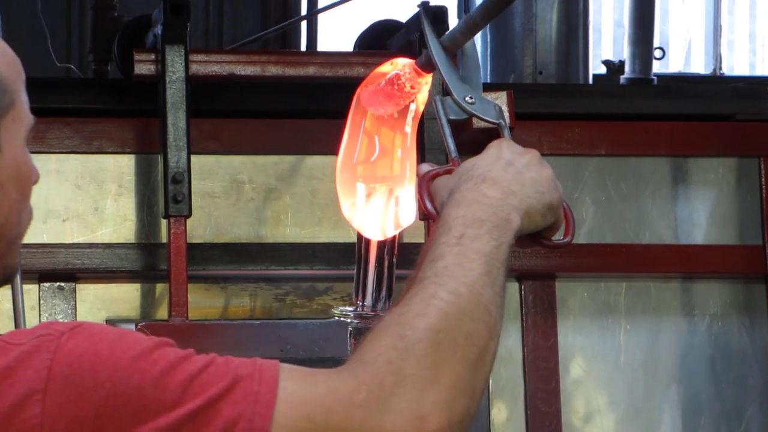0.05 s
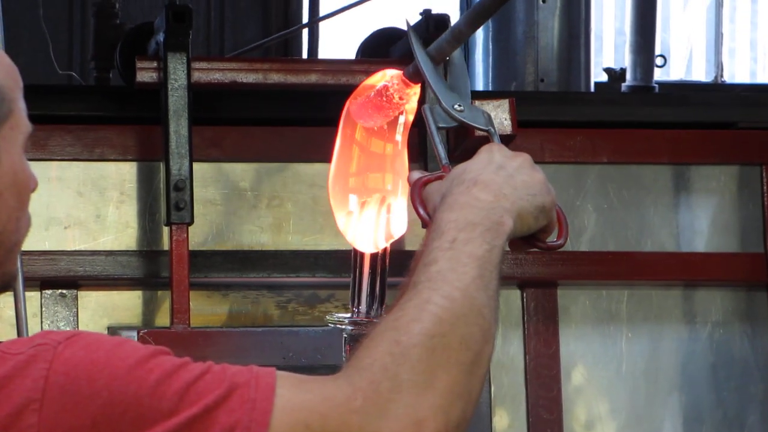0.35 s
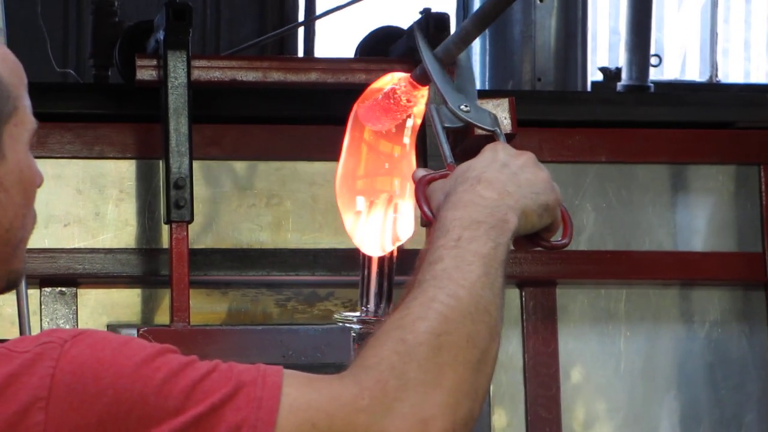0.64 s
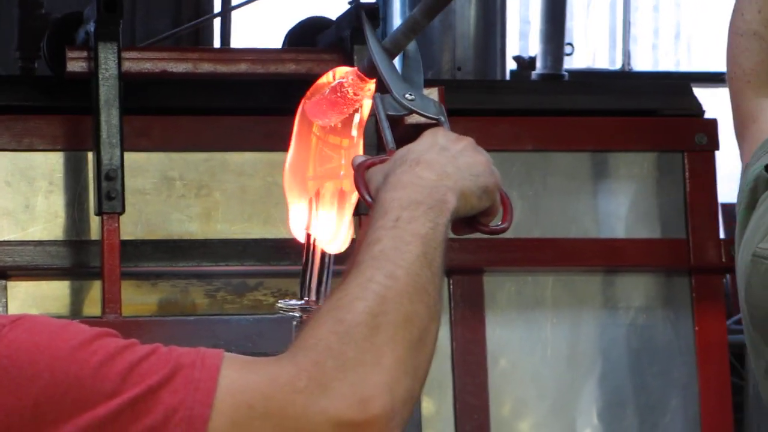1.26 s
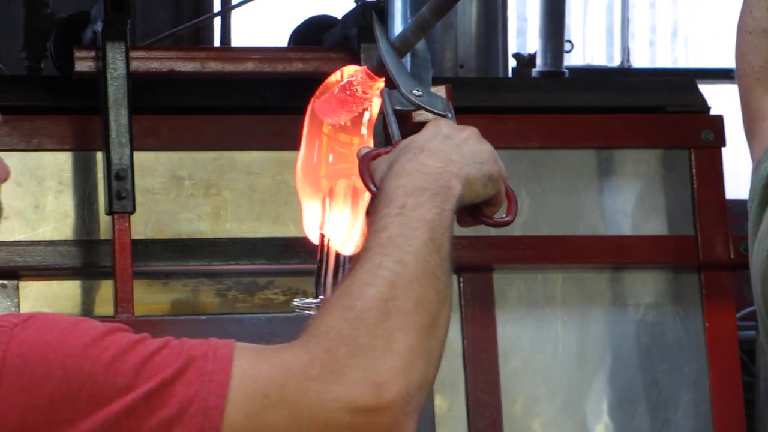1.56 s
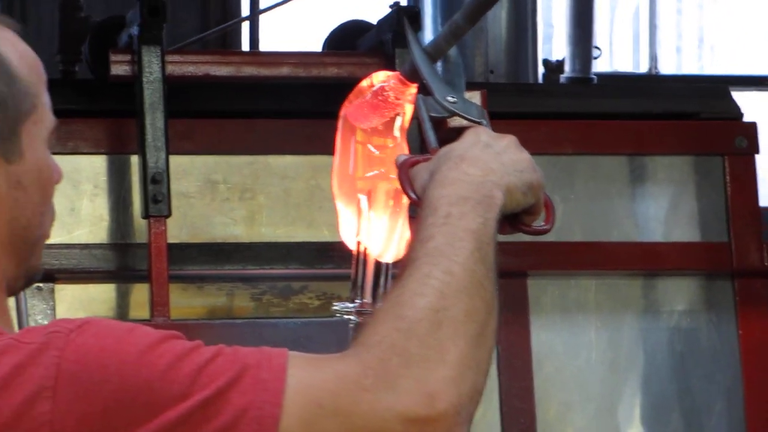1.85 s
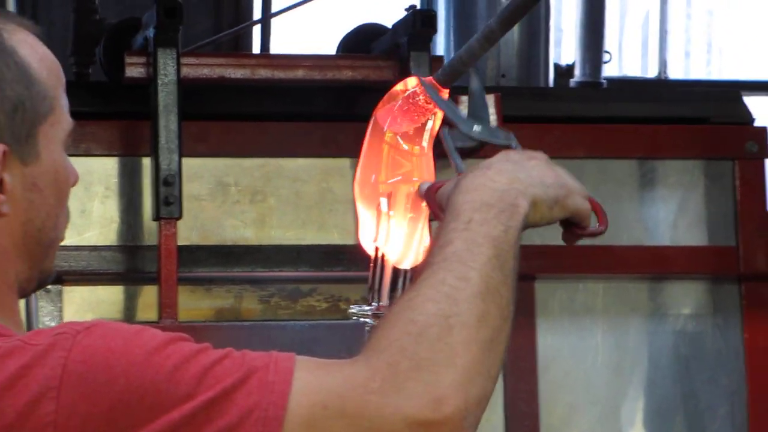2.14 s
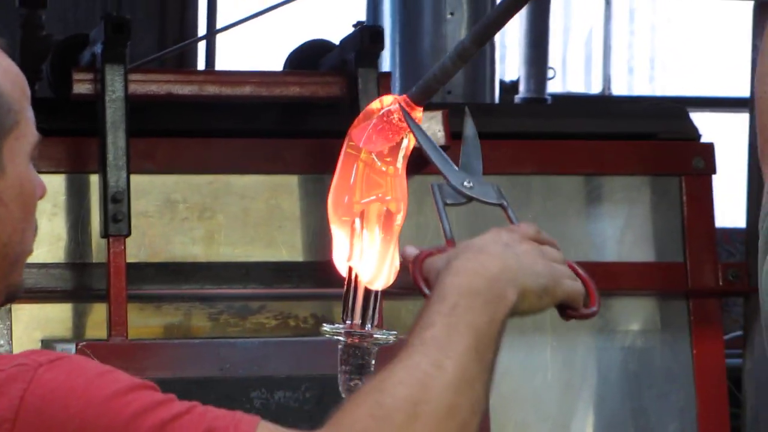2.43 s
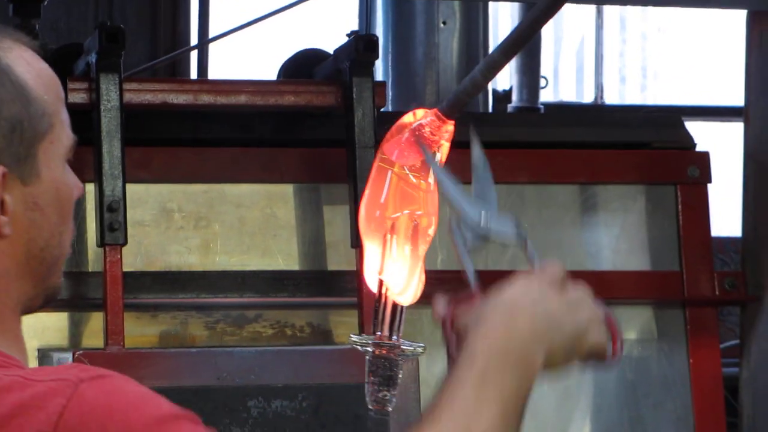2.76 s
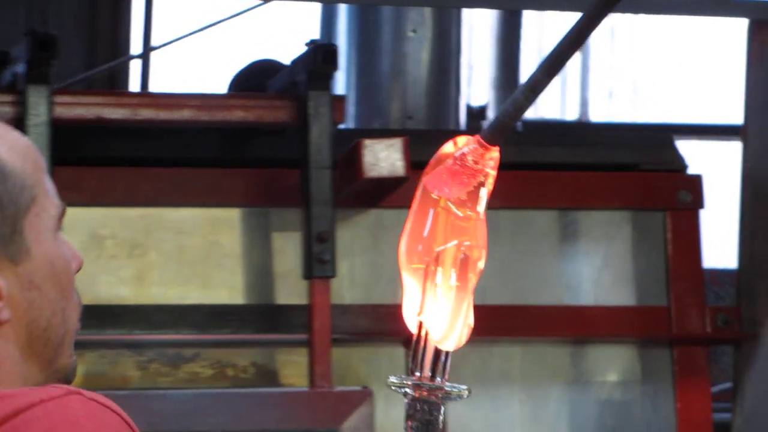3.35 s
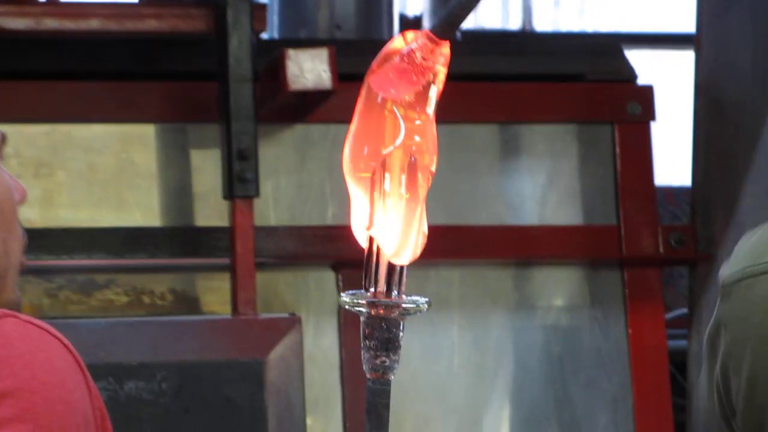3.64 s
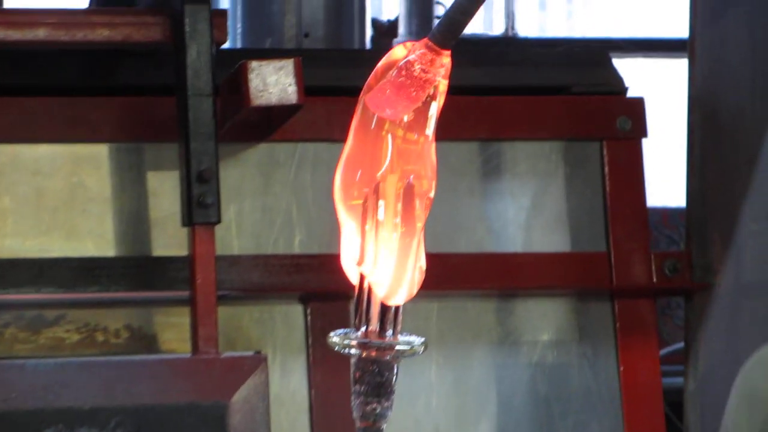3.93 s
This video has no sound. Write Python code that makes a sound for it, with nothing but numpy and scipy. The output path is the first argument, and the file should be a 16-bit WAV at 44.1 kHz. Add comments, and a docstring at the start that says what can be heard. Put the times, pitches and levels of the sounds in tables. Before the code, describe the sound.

A gas furnace roars throughout, with a thin hiss and a deep wavering boom that surges near 1.8 seconds. From 0.3 seconds, steel shears tick and scrape faintly on hot glass. At 2.2 seconds they snap shut with a sharp crack, ringing briefly in the hall. After 3 seconds the boom sinks, the hiss lifts with a faint sizzle, and tools knock lightly a few times.

```python
"""A gas furnace roars in a glass workshop: flame noise rings in hood and ducts, a thin hiss on top.
Almost at once a low boom swells in its chamber, and steel shears start working into hot glass
with faint ticks and scrapes. The boom surges near 1.8 s; at 2.2 s the blades snap shut once,
crack and ring, and the hall answers. In the last second the boom sinks, tools tick and knock,
and the hiss grows as a fine sizzle joins it."""
import sys
import numpy as np
from scipy import signal
from scipy.fft import rfft, irfft
from scipy.io import wavfile

SR = 44100
rng = np.random.default_rng(int(sys.argv[2]) if len(sys.argv) > 2 else 0)


def int16_out(signal):
    """Quantize to a 16-bit WAV file."""
    q = np.round(np.clip(np.atleast_2d(signal).T, -1, 1) * 32767)
    wavfile.write(sys.argv[1], SR, q.astype(np.int16))


N = 176400
TIME = np.arange(N) / SR
FREQS = np.maximum(np.fft.rfftfreq(N, 1 / SR), 1)
SIDE = np.array([[.5], [-.5]])  # shares a left-minus-right amount between the channels


def from_db(db):
    """Decibels to gain."""
    return 10 ** (np.asarray(db) / 20)


def unit_power(x):
    """Scale to an RMS of one."""
    return x / np.sqrt(np.mean(x ** 2) + 1e-20)


def fader(rows):
    """One per-sample curve for each level column of a time table."""
    times, *columns = np.transpose(rows)
    return [np.interp(TIME, times, column) for column in columns]


def over_hz(points):
    """Breakpoints joined by straight lines over log frequency."""
    hz, values = np.transpose(points)
    return np.interp(np.log(FREQS), np.log(hz), values)


def resonance(hz, width_hz):
    """Gain of a resonant peak; centred on 0 Hz it is a low-pass."""
    return 1 / (1 + 2 * ((FREQS - hz) / width_hz) ** 2)


def noise(colour):
    """Mono noise of a given colour, unit power."""
    return unit_power(irfft(rfft(rng.standard_normal(N)) * colour, N))


def burst(start_s, decay_s):
    """A spray of grit with an instant attack and a dying tail, unit energy."""
    age = TIME - start_s
    grit = rng.standard_normal(N) * (age >= 0) * np.exp(-np.clip(age / decay_s, 0, 20))
    return grit / np.linalg.norm(grit)


# Pan of the furnace bed: f/Hz, left-minus-right level/dB
BED_PAN = [(30, 0), (46, -6), (65, -7.5), (105, -8.5), (150, -14), (220, -13), (400, -11), (550, -8.5),
           (850, -4.5), (1200, -6.5), (2700, -1.5), (6400, -1), (9800, -3), (15000, 1.5)]
# Phase offset of the bed: f/Hz, left lead/rad
BED_PHASE = [(30, -1.25), (85, -0.94), (135, -0.78), (220, 0.42), (300, 0.37), (550, 0.46), (950, 0.029),
             (1200, 0.61), (1800, 0.77), (5000, .2), (7200, .2), (12000, 1)]
def place_bed(spectra):
    """Two spectra become unit-power stereo, leaning right and offset in phase."""
    pan = from_db(SIDE * over_hz(BED_PAN))
    pan = pan / np.sqrt(np.mean(pan ** 2, axis=0))
    phase = np.exp(1j * SIDE * over_hz(BED_PHASE))
    return unit_power(irfft(spectra * pan * phase, N))


# Stereo image of the bed: f/Hz, left-right likeness (0 is wide; capped at 0.99, nearly mono)
BED_LIKENESS = [(30, -1), (65, 2.3), (110, 0.9), (220, 0.9), (410, 1.4), (550, 0.6), (900, .94),
                (1400, 0.84), (3500, 0.77), (7500, .45), (15000, 0)]
def bed_noise(colour):
    """Coloured noise spread by the hall: narrow in the low mids, wide in the treble."""
    alike = np.clip(over_hz(BED_LIKENESS), 0, .99)
    mid, side = rfft(rng.standard_normal((2, N)))
    spectra = np.sqrt(1 + alike) * mid + 2 * SIDE * np.sqrt(1 - alike) * side
    return place_bed(colour * spectra)


# EQ of the sizzle: f/Hz, relative level/dB
SIZZLE_EQ = [(9500, -30), (10400, 3), (11400, -2), (12100, -4), (13100, -4), (15500, -3)]
def sizzle(start_s=2.99, rise_s=.03, level_db=-64.5):
    """Very high, faint sizzle that fades in quickly and stays."""
    fade_in = np.clip((TIME - start_s) / rise_s, 0, 1)
    return from_db(level_db) * fade_in * bed_noise(from_db(over_hz(SIZZLE_EQ)))


# EQ of the hiss: f/Hz, relative level/dB
HISS_EQ = [(2500, -8), (5000, -1.5), (6200, 4), (7500, -2.5), (9500, 0), (10800, 4.5), (13200, 4),
           (15500, -5.5)]
# Fader ride of the hiss: t/s, level/dB
HISS_RIDE = [(0, -62), (.8, -67.5), (1.2, -65), (2.0, -64.5), (2.93, -67), (3.02, -62.5), (4, -61.5)]
def hiss():
    """Thin, smooth treble hiss that lifts in the last second."""
    level_db, = fader(HISS_RIDE)
    return from_db(level_db) * bed_noise(from_db(over_hz(HISS_EQ)))


# EQ of the turbulent flame: f/Hz, relative level/dB
FLAME_EQ = [(12, -12), (22, -7), (32, -5), (44, 2.5), (85, 2), (105, -3), (135, 3), (175, -2.5), (218, -6),
            (270, -4), (400, -3.5), (490, -9), (700, -12.5), (860, -13.5), (960, -9.5), (1200, -19),
            (1500, -23), (1900, -30), (2300, -32.5), (3000, -38.5), (4000, -49), (6000, -56.5),
            (16000, -60)]
# Resonances of hood and ducts: f/Hz, width/Hz, level/dB
DUCT_MODES = [(133.5, 25, -38.5), (167.9, 7.2, -39.5), (235.2, 3.3, -40.5), (253.5, 5, -46),
              (278.5, 5, -41.5), (301.4, 10.2, -41), (413.2, 9.5, -47), (427.6, 6, -36.5),
              (447.8, 8.6, -43), (542, 7.3, -42.5), (568.8, 8.9, -43.5), (807, 16.3, -39.5),
              (911.5, 24, -45), (973.4, 16.6, -41), (995, 34, -45.5), (1127, 27, -49.5), (1300, 13, -53),
              (1324, 18, -71), (2156, 29, -62)]
# Rides of the two flame bands, each taken around its mean: t/s, roar level/dB, rush level/dB
FLAME_RIDE = [(0, -25, -33.5), (.22, -26.5, -34), (.75, -26, -33), (1.15, -28, -33), (1.42, -28, -33.5),
              (1.6, -27, -32.5), (1.85, -27, -34.5), (2.03, -27, -32.5), (2.2, -28, -33),
              (2.6, -27.5, -33.5), (2.92, -29.5, -33), (3.02, -31, -35), (3.55, -30.5, -35),
              (3.87, -30.5, -35.5), (4, -27, -34)]
CROSSOVER_HZ = 310
def flame(level_db=-25, flicker_db=.5, rush_depth=.97):
    """Flickering turbulence drives hood and ducts; low roar and upper rush swell separately."""
    flicker = flicker_db * noise(resonance(0, 37))
    sound = from_db(level_db + flicker) * bed_noise(from_db(over_hz(FLAME_EQ)))
    for hz, width_hz, db in DUCT_MODES:
        sound = sound + from_db(db) * bed_noise(resonance(hz, width_hz))
    roar = irfft(rfft(sound) / (1 + (FREQS / CROSSOVER_HZ) ** 4), N)
    rush = sound - roar
    roar_db, rush_db = (ride - ride.mean() for ride in fader(FLAME_RIDE))
    return roar * from_db(roar_db) + rush * from_db(rush_depth * rush_db)


# Swells of the furnace chamber: t/s, level/dB
BOOM_RIDE = [(0, -30.5), (.13, -31), (.24, -26.5), (.6, -25.5), (.8, -27), (.87, -33), (1.2, -28.5),
             (1.42, -48), (1.55, -25.5), (1.69, -44), (1.79, -18.5), (2.07, -27), (2.21, -19.5),
             (2.46, -31), (2.6, -23.5), (2.9, -23), (3.1, -31), (4, -37.5)]
def boom(pitch_hz=67.04, wander_hz=2.94, wobble_rate_hz=8.9, flutter_db=1, trim_db=-.73):
    """The chamber's lowest resonance sustains itself: one deep tone that wanders and flutters."""
    level_db, = fader(BOOM_RIDE)
    wobble_band = resonance(0, wobble_rate_hz)
    hz = pitch_hz + wander_hz * noise(wobble_band)
    tone = np.sin(2 * np.pi * np.cumsum(hz) / SR)
    stereo_tone = place_bed(rfft(tone) * (FREQS < CROSSOVER_HZ))
    return from_db(level_db + trim_db + flutter_db * noise(wobble_band)) * stereo_tone


# Higher resonances of the chamber: f/Hz, width/Hz, level/dB against the boom's ride
CHAMBER_MODES = [(81, 3.5, -11.5), (140, 27, -13), (160.2, 13, -10.5)]
def chamber():
    """Rough upper resonances that swell with the boom and give it body."""
    level_db, = fader(BOOM_RIDE)
    body = sum(from_db(db) * bed_noise(resonance(hz, width_hz)) for hz, width_hz, db in CHAMBER_MODES)
    return from_db(level_db) * body


def hall(send, t60_s=.57, build_s=.0086):
    """Dense reflections that build quickly and die away, with their own tail on each side."""
    t = np.arange(SR) / SR
    envelope = np.exp(-np.log(1000) * t / t60_s) * (1 - np.exp(-t / build_s))
    tail = unit_power(rng.standard_normal((2, SR)) * envelope) / np.sqrt(SR)
    return signal.fftconvolve(send[None], tail, axes=1)[:, :N]


# Tool handling: t/s, level/dB, f/Hz, t60/s
TOOL_KNOCKS = [(1.7024, -43, 3080, 0.022), (2.945, -62, 6000, 0.028), (3.344, -44, 2550, 0.028),
               (3.425, -57, 6000, 0.036), (3.63, -40, 2100, .03), (3.962, -40, 1810, 0.032)]
def knocks(relative_width=.13):
    """Small, quickly damped knocks of tools being handled."""
    sound = 0
    for start_s, db, hz, t60_s in TOOL_KNOCKS:
        age = TIME - start_s
        decay = (age >= 0) * from_db(-60 * np.clip(age / t60_s, 0, 2))
        sound = sound + from_db(db) * decay * noise(resonance(hz, relative_width * hz))
    return sound


# Blade scrapes: centre t/s, half length/s, level/dB, f/Hz
BLADE_SCRAPES = [(1.027, .03, -72, 7000), (1.318, .025, -64, 13500), (1.67, .02, -69, 12800),
                 (1.732, .018, -63, 7000), (2.075, .025, -64.5, 6470), (2.077, .02, -65, 13200),
                 (2.174, .014, -58.5, 11800), (2.73, .02, -66, 12800), (3.367, .015, -60, 3800),
                 (3.392, .04, -64, 12500), (3.746, .04, -67, 6500)]
def scrapes(relative_width=.32):
    """The blades rub on the glass and on each other in short, soft swells of bright noise."""
    sound = 0
    for centre_s, half_s, db, hz in BLADE_SCRAPES:
        swell = np.exp(-.5 * ((TIME - centre_s) / half_s) ** 2)
        sound = sound + from_db(db) * swell * noise(resonance(hz, relative_width * hz))
    return sound


# Blade contacts with the glass: t/s, relative level/dB, low-pass f/Hz, decay/s
GLASS_BITES = [(.3015, -19, 18000, .004), (.309, -17, 12000, .004), (.322, -15, 14000, .04),
               (.668, -19, 14000, .012), (0.927, -21, 15000, .015), (1.7, -14, 4000, .004),
               (1.7105, -16, 14000, .005), (1.717, -15, 10000, .004), (1.723, -10, 9000, .045),
               (2.025, -17, 6000, .003), (2.528, -21, 15000, .002), (2.942, -16, 9000, .008),
               (2.999, -18, 20000, .002), (3.378, -17, 12000, .008), (3.424, -12, 11000, .005),
               (3.441, -14, 12000, .014), (3.63, -16, 3000, .005)]
# EQ of steel crunching on glass: f/Hz, relative level/dB
CRUNCH_EQ = [(800, -23), (2500, 15), (4200, -2), (6000, 0.5), (8500, -1.5), (11000, 3), (13500, 4),
             (16000, 4)]
def bites(trim_db=-12.5):
    """The blades bite into hot glass in small broadband ticks and crunches."""
    grit = 0
    for start_s, db, lowpass_hz, decay_s in GLASS_BITES:
        grit = grit + from_db(db) * rfft(burst(start_s, decay_s)) / np.hypot(1, FREQS / lowpass_hz)
    return from_db(trim_db) * irfft(grit * from_db(over_hz(CRUNCH_EQ)), N)


# Mode clusters of the steel blades: f/Hz, relative level/dB, t60/s
BLADE_MODES = [(3500, -2, 0.13), (4300, -6, .16), (5000, -10, .14), (6000, -9, .15), (6870, -3, 0.3),
               (8021, -7, 0.19), (9250, -8, 0.17), (10600, -1, .23), (11680, -3, .27), (12450, -10, .17),
               (13250, -3, .13), (14860, -10, .2), (15650, -10, .14)]
def blade_ring(blows, cluster_width_hz=210):
    """Clusters of close modes: every blow adds energy, and each cluster dies at its own rate."""
    ring = 0
    for hz, mode_db, t60_s in BLADE_MODES:
        energy = 0
        for start_s, blow_db, _ in blows:
            age = TIME - start_s
            energy = energy + (age >= 0) * from_db(blow_db - 60 * np.clip(age / t60_s, 0, 4)) ** 2
        ring = ring + from_db(mode_db) * np.sqrt(energy) * noise(resonance(hz, cluster_width_hz))
    return ring


# The closing blow and its two rebounds: t/s, relative level/dB, decay/s
SNAP_BLOWS = [(2.1942, 1.5, .0028), (2.203, 0, .0075), (2.211, -9, 0.018)]
# EQ of steel cracking on steel: f/Hz, relative level/dB
CRACK_EQ = [(800, -27), (2200, 5), (3500, -7), (6000, 0.5), (7000, 3), (7700, -6), (9500, 0), (10800, 7.5),
            (12500, 1), (13400, 6), (14200, -4), (16000, -3)]
def snap(crack_db=-13, ring_db=-50.5):
    """The blades snap shut and rebound: each blow is a dry crack and sets them ringing."""
    grit = sum(from_db(db) * burst(start_s, decay_s) for start_s, db, decay_s in SNAP_BLOWS)
    crack = irfft(rfft(grit) * from_db(over_hz(CRACK_EQ)), N)
    return from_db(crack_db) * crack + from_db(ring_db) * blade_ring(SNAP_BLOWS)


def scene(hall_db=-4, tools_pan_db=-3.5, left_lead_s=1e-5):
    """The furnace bed under the tools, which are a little louder on the right and feed the hall."""
    steel = snap() + bites() + scrapes() + knocks()
    direct = irfft(rfft(steel) * np.exp(2j * np.pi * FREQS * left_lead_s * SIDE), N)
    tools = (direct + from_db(hall_db) * hall(steel)) * from_db(tools_pan_db * SIDE)
    return flame() + boom() + chamber() + hiss() + sizzle() + tools


def record(dry, fade_s=.003, cutoff_hz=15850):
    """Short fades at both ends, then a steep high cut."""
    fades = np.minimum(1, np.minimum(TIME, TIME[::-1]) / fade_s)
    high_cut = signal.ellip(12, .1, 80, cutoff_hz, fs=SR, output="sos")
    return signal.sosfilt(high_cut, dry * fades)


dry = scene()
out = record(dry)
int16_out(out)
```